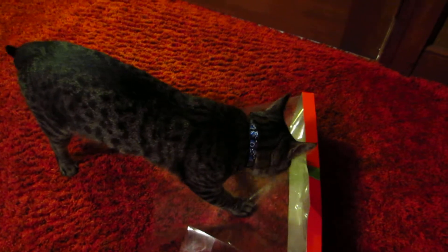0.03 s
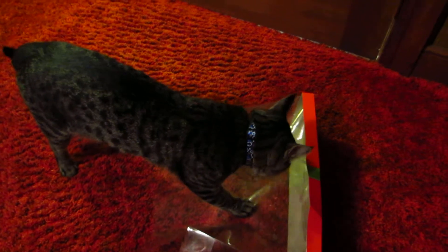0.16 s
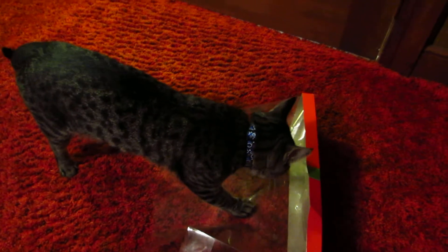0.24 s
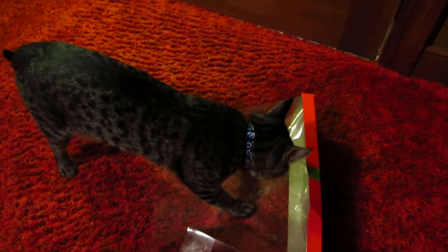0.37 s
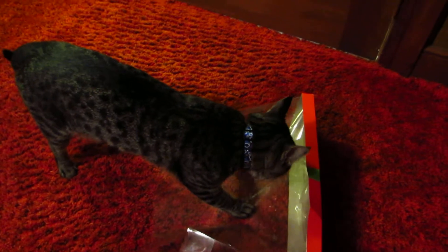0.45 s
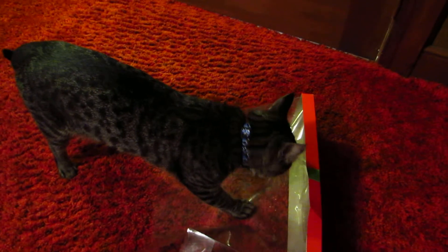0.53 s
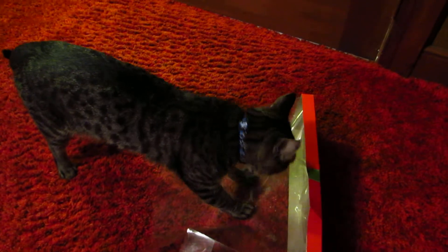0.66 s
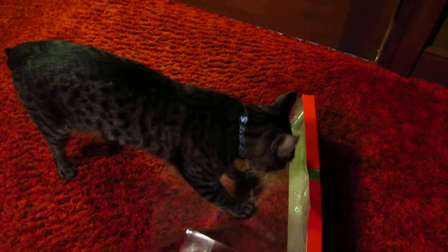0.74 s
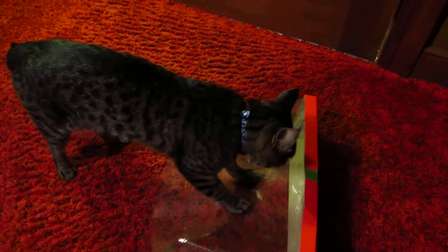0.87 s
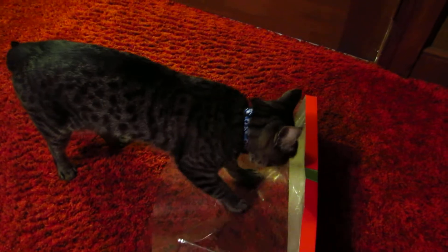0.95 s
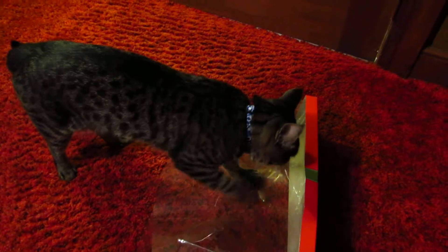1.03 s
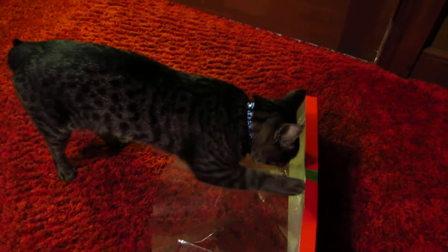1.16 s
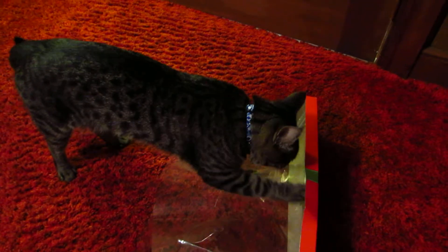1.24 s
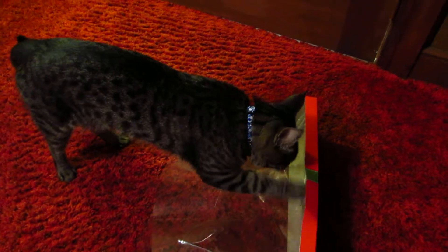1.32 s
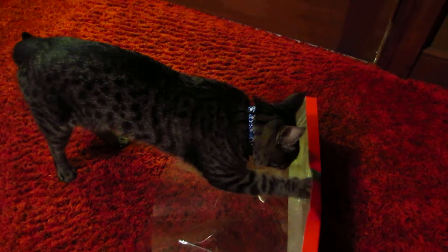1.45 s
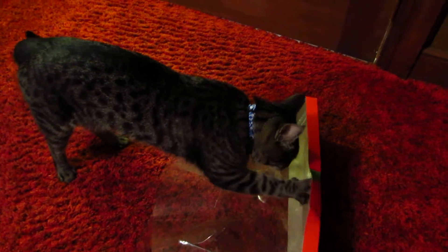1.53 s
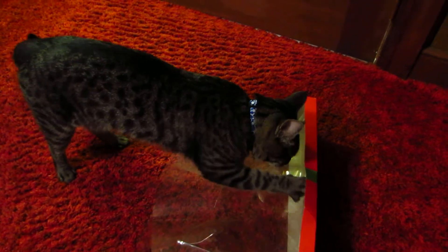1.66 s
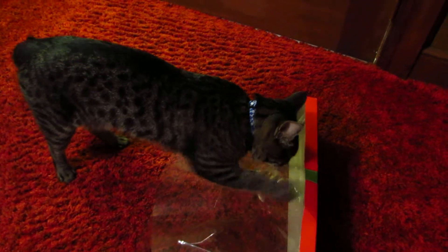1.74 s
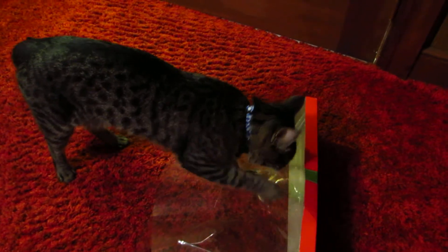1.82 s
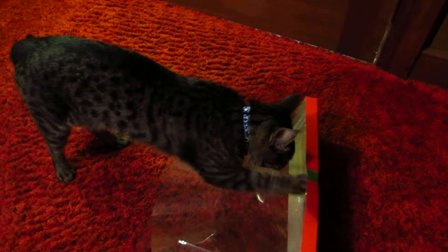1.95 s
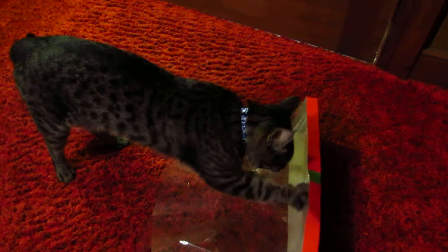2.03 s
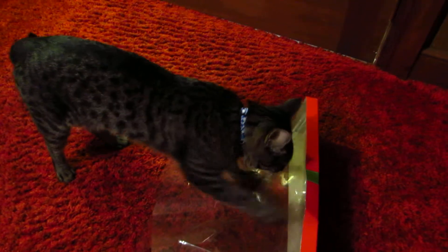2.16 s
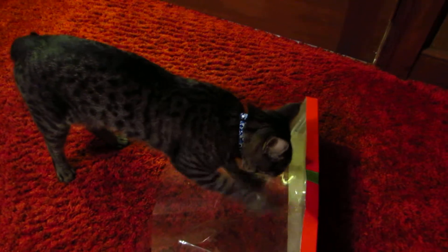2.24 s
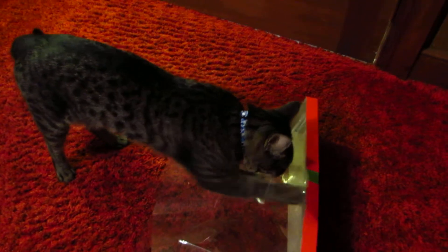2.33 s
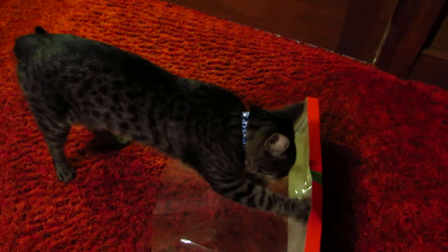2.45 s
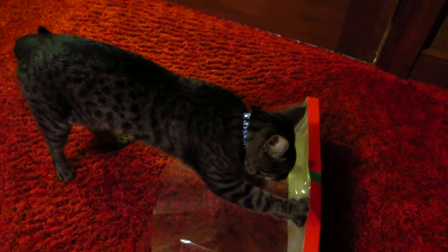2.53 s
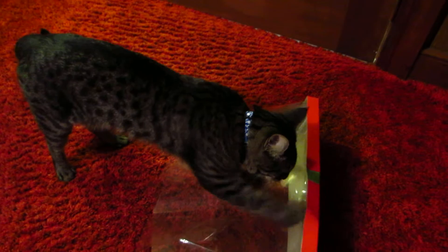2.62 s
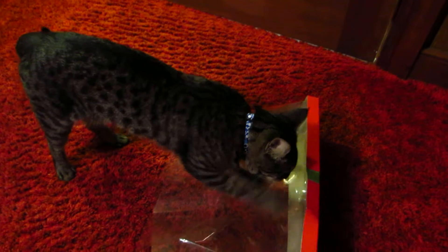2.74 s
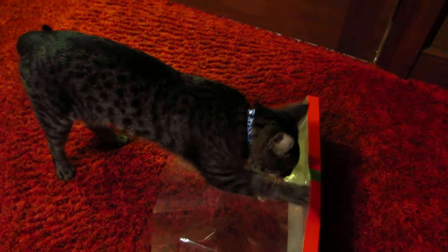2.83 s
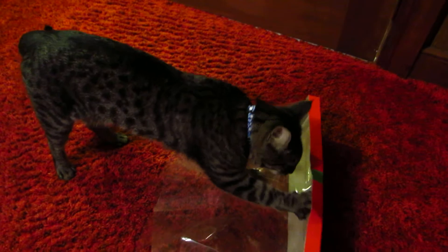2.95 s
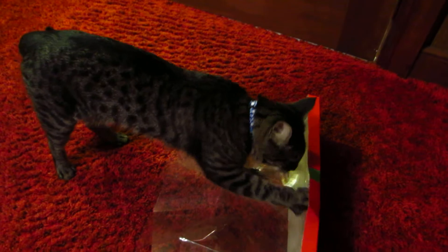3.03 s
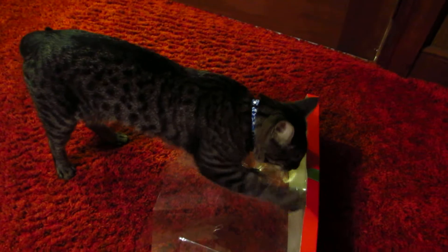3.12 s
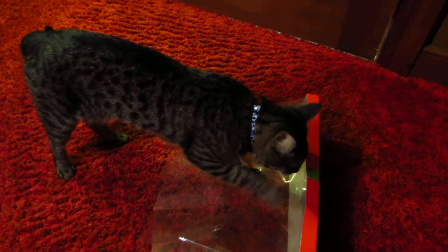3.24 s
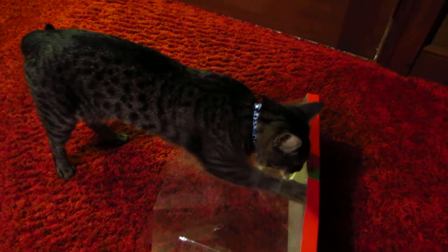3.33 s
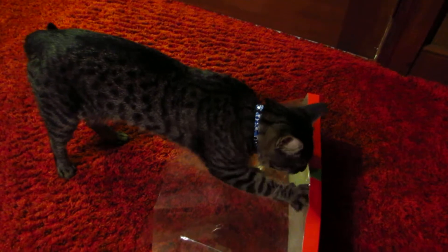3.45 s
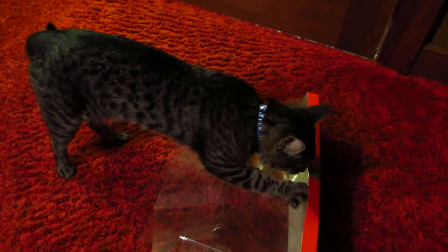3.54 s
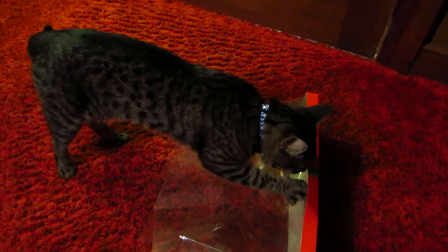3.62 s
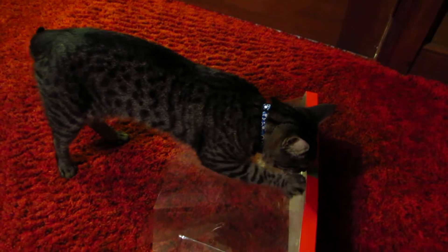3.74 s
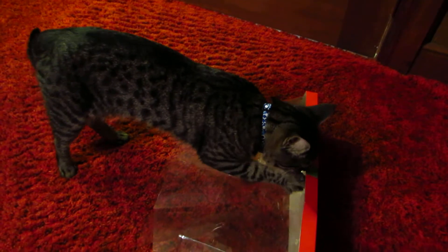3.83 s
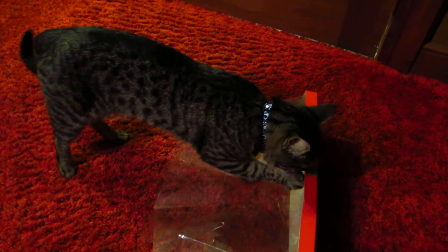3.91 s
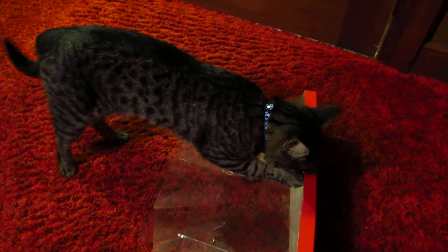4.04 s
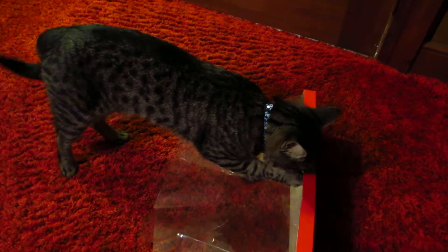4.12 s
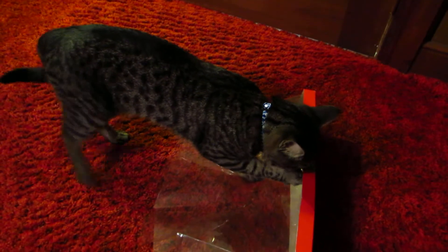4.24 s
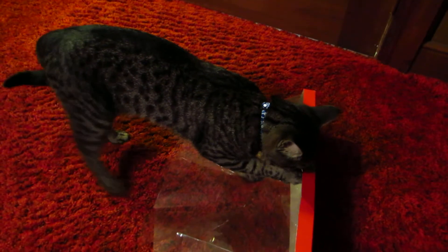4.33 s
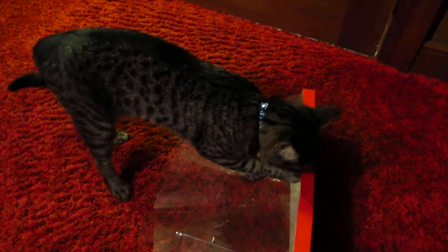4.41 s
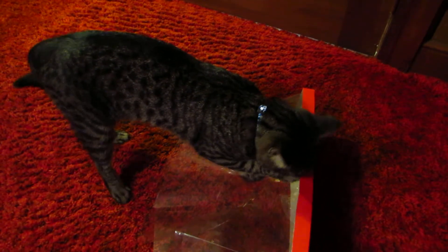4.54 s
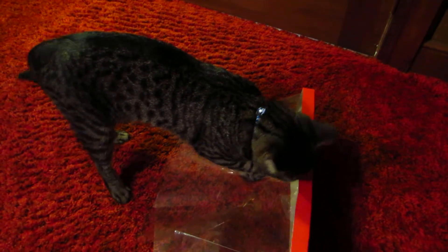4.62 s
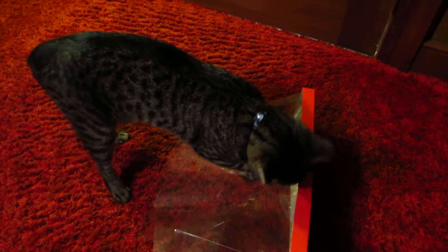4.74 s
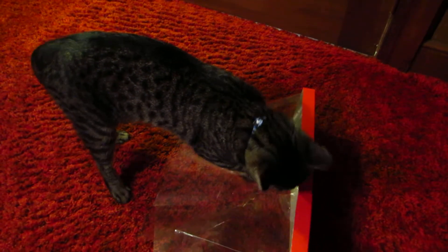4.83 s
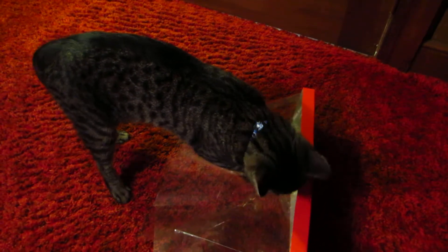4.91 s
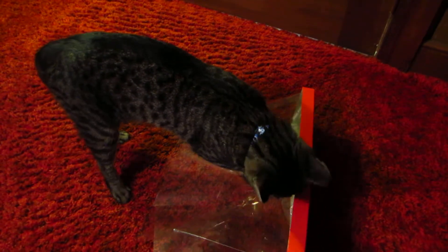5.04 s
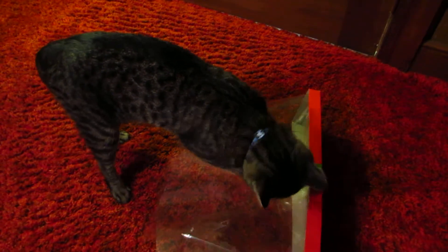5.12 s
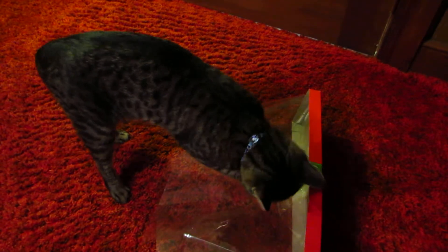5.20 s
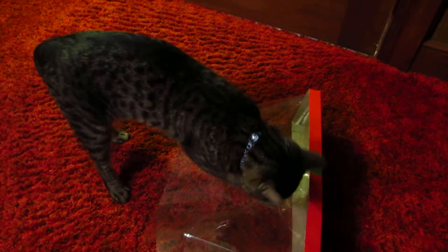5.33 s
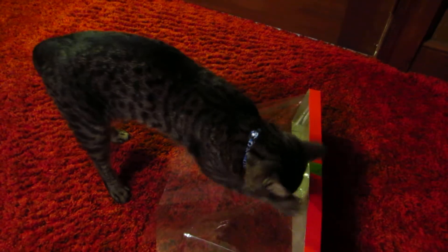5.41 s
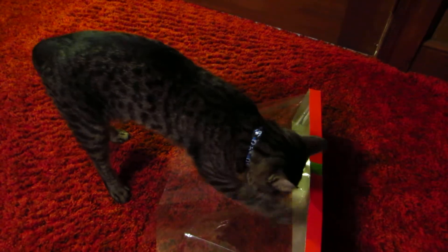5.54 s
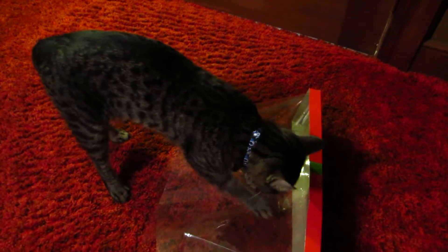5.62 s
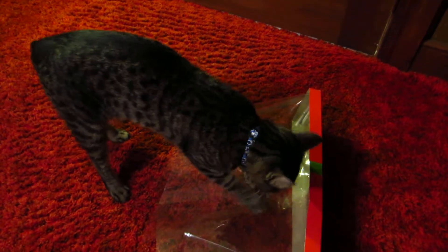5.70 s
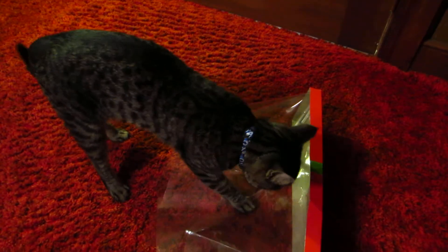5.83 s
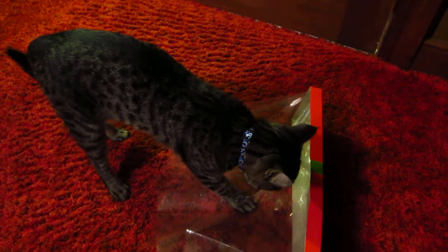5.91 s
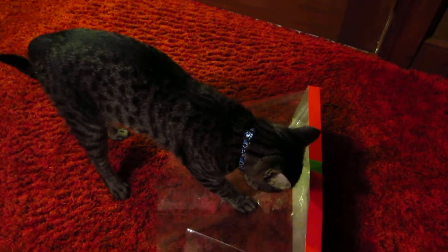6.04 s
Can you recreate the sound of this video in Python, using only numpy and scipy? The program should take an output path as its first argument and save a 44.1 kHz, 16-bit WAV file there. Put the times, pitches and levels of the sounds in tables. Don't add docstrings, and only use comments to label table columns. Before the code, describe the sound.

A cat's paw thumps a hollow cardboard lid while claws snap and crack a plastic sheet, close up over steady hiss.

```python
import sys
import numpy as np
from scipy import signal
from scipy.fft import rfft, irfft, next_fast_len
from scipy.io import wavfile
from scipy.ndimage import uniform_filter1d

SR = 44100
rng = np.random.default_rng(int(sys.argv[2]) if len(sys.argv) > 2 else 0)


def voltage_ratio(decibels):
    exponent = np.asarray(decibels, float) / 20
    return 10 ** exponent


def dump_mix(stems):
    frames = np.atleast_2d(stems).T
    limited = np.clip(frames, -1, 1)
    pcm = np.round(limited * 32767).astype(np.int16)
    wavfile.write(sys.argv[1], SR, pcm)


N = 267687
T = np.arange(N) / SR

# time in seconds, level in dB.
HISS_LEVEL = [(0.0, -71.5), (0.64, -62.5), (0.81, -60.5), (1.17, -60), (1.59, -56.5), (2.94, -53.5),
              (3.03, -53.5), (3.23, -56), (3.65, -52), (4.41, -56), (4.7, -53.5), (4.99, -53),
              (5.24, -61.5), (5.49, -58), (5.7, -56), (6.07, -53)]
# frequency in Hz, level in dB per Hz.
HISS_TONE = [(12, -28), (20, -6.5), (55, -9), (91, -9.5), (367, -9), (897, -18.5), (1610, -23), (1760, -26),
             (3530, -29), (3950, -32.5), (7110, -32.5), (14700, -53.5), (16000, -60.5)]
# frequency in Hz, likeness from -1 to 1.
HISS_LIKENESS = [(30, 0.18), (100, -0.9), (300, -0.45), (1400, -0.78), (5000, -0.037)]
# peak time in seconds, level in dB, swell in seconds, fade in seconds.
SHOVES = [(.005, -24, 0.06, 0.039), (.29, -63, 0.25, 0.39), (.96, -35.5, 0.3, 0.14),
          (1.27, -50, 0.22, 0.25), (1.64, -48, 0.24, .13), (2.08, -30.5, 0.13, 0.17), (2.52, -52, .1, 0.1),
          (2.91, -57, 0.082, 0.21), (3.04, -31, 0.049, 0.22), (3.7, -42, 0.49, 0.22),
          (4.11, -44.5, 0.42, 0.039), (5.11, -21.5, 0.04, 0.12), (5.99, -48.5, 1, 0.71)]
# peak time in seconds, scrape level in dB,
# rustle in dB relative to the scrape, swell in seconds, fade in seconds.
SLIDES = [(.005, -37.5, -28, 0.095, 0.13), (.3, -62.5, 8.5, 0.07, 0.22), (.4, -56.5, 2.5, 0.3, 0.14),
          (.48, -55.5, 2.5, 0.35, 0.028), (.86, -42.5, -0.5, 0.14, 0.18), (1.45, -47.5, 6, 0.023, .06),
          (1.5, -57, -2, 0.37, 1), (2.615, -45, 7, .04, .03), (2.08, -57, -25, 0.37, 0.23),
          (2.45, -56.5, 14, 0.13, 0.13), (2.55, -48, -2, .05, 0.087), (2.909, -48.5, 2, 0.076, 0.2),
          (3.05, -44, 2.5, 0.037, 0.26), (3.16, -50, -15, .2, 0.25), (4.22, -55, -20, 0.084, 0.49),
          (5.19, -49.5, -16, 0.101, 0.16), (5.53, -45, 2, 0.034, 0.11), (5.58, -44, 1.5, .1, 0.071),
          (5.63, -58, -3, .1, 0.03), (5.99, -47, 2.5, 0.52, 0.037)]
# frequency in Hz, width in Hz, level in dB.
LID_NOTES = [(451.3, 47, -2.5), (514.5, 32.2, 0.5), (627.8, 89.5, 2.5), (727, 204, 4), (782, 132, 3.5),
             (944, 71, -8), (1118, 174, -6.5), (1400, 715, -7), (1700, 1940, -11.5)]
# frequency in Hz, width in Hz, level in dB.
FLEX_NOTES = [(123.7, 29, -9.5), (235.5, 66.5, -2), (296.5, 84, -2.5), (341.7, 24.8, 2)]
# frequency in Hz, level in dB per Hz.
SIZZLE_TONE = [(2500, -26), (4000, 6), (5500, 10.5), (7700, 9), (8300, 6.5), (12000, 3), (14500, -4),
               (16500, 3)]
# start in seconds, peak in dB, deep flex in dB relative to the peak,
# time for the rattle to die by 60 dB in seconds.
TOE_BLOWS = [(.013, -24, -41, 0.27), (.633, -42, 1.5, 0.41), (1.276, -16.5, -32, 0.19),
             (1.462, -20, -13, 0.17), (1.597, -23, -8, 0.08), (1.640, -9, -15.5, 0.13),
             (1.955, -29.5, -10, 0.42), (2.448, -27.5, 1.5, 0.36), (2.569, -18.5, -7, 0.022),
             (2.916, -20.5, -5, 0.098), (3.378, -11.5, -14, 0.11), (3.392, -14.5, -15, 0.091),
             (3.56, -21, -8, 0.042), (3.604, -18, -11, 0.091), (3.623, -18.5, -4.5, 0.065),
             (3.684, -41, -2, 0.048), (4.151, -8.5, -13.5, 0.042), (4.556, -45, -1.5, 0.036),
             (4.754, -11, -8.5, 0.035), (5.07, -16, -22, 0.02), (5.078, -17, -7.5, 0.092),
             (5.103, -8.5, -24, 0.089), (5.815, -24, -7.5, 0.03), (5.834, -26, -12.5, 0.033)]
# start in seconds, peak in dB, deep flex in dB relative to the peak,
# time for the rattle to die by 60 dB in seconds.
PAD_BLOWS = [(.217, -34, -9.5, 0.36), (.277, -40.5, -3.5, 0.09), (.346, -27, -10.5, 0.0068),
             (.619, -28.5, -13, 0.17), (.8535, -13, -12.5, 0.015), (.857, -16.5, -15, 0.026),
             (.888, -35, -4, 0.33), (1.288, -19, -8.5, 0.12), (1.358, -33.5, -3, 0.085),
             (2.001, -15.5, -6.5, 0.18), (2.018, -18.5, -10, 0.069), (2.125, -15.5, -7.5, 0.031),
             (2.139, -18, -10, 0.17), (2.379, -28, -9, 0.27), (2.423, -12, -23, 0.048),
             (2.474, -13, -38, 0.03), (2.627, -14, -17, 0.066), (2.86, -24, -9, 0.049),
             (2.868, -15.5, -9, 0.064), (2.884, -11.5, -16.5, 0.15), (3.023, -21.5, -6.5, 0.045),
             (3.425, -20.5, -10.5, 0.093), (3.735, -30.5, -18, 0.095), (4.089, -32.5, -7, 0.03),
             (5.508, -16.5, -14, 0.12), (5.554, -26.5, -11, 0.042)]
# start in seconds, peak in dB, deep flex in dB relative to
# the peak, time for the rattle to die by 60 dB in seconds.
TIP_BLOWS = [(.7125, -5, -24.5, 0.028), (.874, -9.5, -14.5, 0.16), (1.222, -39.5, -3, 0.047),
             (1.288, -47, -15, 0.26), (1.723, -18.5, -14, 0.052), (1.739, -19, -16, 0.034),
             (1.753, -21, -9, 0.044), (1.995, -18, -10, 0.08), (2.406, -9, -14.5, 0.099),
             (2.6105, -9, -10, 0.048), (2.875, -8, -25, 0.095), (2.951, -16.5, -16, 0.028),
             (3.045, -5, -21, 0.048), (3.089, -11.5, -17.5, 0.025), (3.109, -15, -7.5, 0.035),
             (3.3365, -26, -8, 0.87), (4.763, -34, -13, 0.018), (5.095, -20.5, -7, 0.043),
             (5.116, -16.5, -12, 0.12), (5.4625, -27.5, -13, 0.09), (5.745, -34, -52, 0.041)]
# start in seconds, peak in dB, snap pitch in Hz,
# sizzle in dB relative to the peak.
RAKES = [(.0164, -27, 1390, -17.5), (.62, -31.5, 1700, -18), (.7155, -12, 1950, -36),
         (1.439, -44, 3220, -6), (1.4609, -24, 1680, -13), (1.648, -20.5, 2200, -56),
         (1.7344, -18, 2040, -17), (1.9545, -24, 2840, -15), (2.3528, -26.5, 2000, -12),
         (2.3794, -24.5, 1560, -14.5), (2.5935, -27.5, 2000, -29), (2.9182, -31, 1560, -21),
         (2.9524, -26, 2310, -13.5), (3.3365, -32, 1700, -15), (3.3775, -22.5, 1520, -23),
         (3.6047, -30, 1840, -25), (3.6208, -21, 1400, -19), (5.4643, -26, 1940, -17.5),
         (5.5095, -28, 1600, -35), (6.0522, -35.5, 2580, -13)]
# start in seconds, peak in dB, snap pitch in Hz,
# sizzle in dB relative to the peak.
CATCHES = [(.2135, -35, 1670, -17), (.6719, -39.5, 1910, -16), (.8684, -19.5, 2000, -15.5),
           (.886, -16, 2330, -48), (1.2244, -33, 1900, -26), (1.2925, -30.5, 1360, -18),
           (1.3628, -36.5, 2830, -12), (1.5307, -32.5, 2620, -20), (2.0032, -13.5, 1530, -25),
           (2.0114, -16.5, 1400, -19.5), (2.1344, -19, 1670, -18), (2.3935, -25.5, 2600, -17),
           (2.4063, -29, 1650, -39), (2.4822, -20, 1890, -18.5), (2.546, -37, 1640, -27),
           (2.569, -42, 1400, -26), (2.8434, -17.5, 2620, -17), (2.8594, -27, 2530, -17),
           (2.9433, -25.5, 3080, -28), (3.0485, -42, 1570, -30), (3.1837, -31, 2090, -16),
           (3.3617, -29, 2670, -14), (3.4034, -28, 1640, -13.5), (3.046, -10.5, 1250, -33),
           (3.734, -34, 2170, -36), (4.7547, -4.5, 1400, -41), (5.0702, -26, 2190, -55),
           (5.5877, -32.5, 3270, -12), (5.9533, -33, 1780, -10)]
# start in seconds, peak in dB, snap pitch in Hz,
# sizzle in dB relative to the peak.
SNAPS = [(.7205, -5.5, 1740, -28), (.8586, -13, 1310, -15.5), (1.5945, -26.5, 1490, -24),
         (1.6437, -15.5, 2250, -40), (1.723, -15, 2470, -21.5), (2.1164, -19.5, 2070, -21),
         (2.1265, -12.5, 2270, -13), (2.6208, -9, 2770, -12), (2.8342, -17.5, 3100, -11),
         (2.8738, -18, 1400, -33), (3.0897, -8, 1700, -64), (3.1222, -13.5, 2390, -15.5),
         (3.1314, -20.5, 2600, -18), (4.1512, -4, 2300, -24.5), (4.1548, -24, 2600, -30),
         (5.0957, -4.5, 2440, -12), (5.1062, -15, 2400, -20), (5.5545, -29.5, 2300, -24),
         (5.6254, -31, 1720, -19), (5.7458, -23.5, 2620, -17)]
# start in seconds, peak in dB, pitch in Hz,
# time to die by 60 dB in seconds.
RINGS = [(0.017, -20.5, 526, 0.073), (0.28, -37, 585, 0.077), (0.345, -22.5, 716, 0.034),
         (0.619, -32, 537, 0.054), (0.729, -16, 810, 0.04), (0.721, -12.5, 667, 0.1),
         (0.858, -5, 834, 0.043), (0.861, -19, 833, 0.017), (0.885, -18, 690, 0.013),
         (1.289, -13, 767, 0.041), (1.295, -14, 735, 0.042), (1.466, -23, 623, 0.049),
         (1.598, -17, 623, 0.056), (1.652, -14, 508, 0.051), (1.723, -14, 650, 0.031),
         (1.939, -28, 600, 0.03), (2.002, -19, 720, 0.041), (2.125, -1.5, 673, 0.02),
         (2.189, -25, 627, 0.037), (2.41, -8, 582, 0.067), (2.415, -8.5, 710, 0.077),
         (2.427, -10.5, 434, 0.069), (2.474, -17, 677, 0.059), (2.5685, -8.5, 402, 0.034),
         (2.6112, 0, 380, 0.023), (2.858, -25, 754, 0.035), (2.884, -16, 740, 0.027),
         (2.919, -12, 570, 0.037), (3.033, -23, 670, 0.04), (3.0455, -7, 450, 0.023),
         (3.051, -4, 628, 0.033), (3.336, -13.5, 680, 0.015), (3.393, -2, 586, 0.034),
         (3.5635, -5.5, 656, 0.024), (3.604, -13, 650, 0.031), (4.088, -25, 503, 0.033),
         (4.1525, 0.5, 713, 0.023), (4.159, -20, 525, 0.015), (4.754, -7.5, 485, 0.061),
         (4.762, -19, 970, 0.025), (5.0812, -3.5, 725, 0.02), (5.105, -6, 748, 0.026),
         (5.117, -16, 727, 0.026), (5.46, -20, 580, 0.026), (5.5125, -8.5, 617, 0.037),
         (5.553, -15, 509, 0.029), (5.8185, -25.5, 743, 0.042), (5.835, -19, 434, 0.097),
         (5.746, -27, 405, 0.039)]
# start in
# seconds, peak in dB, pitch in Hz, time to die by 60 dB in seconds.
CRACKS = [(1.639, -22, 2040, 0.013), (0.7128, -3, 990, 0.013), (0.7192, -2.5, 1680, 0.0055),
          (0.859, -26, 1200, 0.008), (0.863, -12, 1410, 0.0088), (0.8666, -4, 1620, 0.0055),
          (1.2246, -33, 1740, 0.008), (1.287, -16, 1350, 0.0089), (1.462, -33, 1280, 0.0089),
          (1.5322, -29, 2720, 0.0071), (1.5945, -28, 1100, 0.0073), (1.6485, -4.5, 1830, 0.007),
          (1.7235, -16, 1740, 0.0076), (3.0898, -5.5, 2180, 0.0082), (1.9555, -24, 3220, 0.0058),
          (0.876, -12, 1790, 0.0073), (2.0075, -5.5, 1290, 0.0069), (2.113, -24, 1910, 0.01),
          (2.128, -37, 1210, 0.0065), (2.3518, -39, 1910, 0.008), (2.394, -30, 1610, 0.008),
          (2.4058, -14, 1620, 0.0093), (2.4726, -12, 1310, 0.0061), (2.5677, -26, 1390, 0.008),
          (2.595, -29, 1770, 0.008), (2.6215, -5, 1700, 0.0032), (2.6105, -20, 1500, 0.008),
          (2.834, -14.5, 2770, 0.0097), (2.8735, -9.5, 1420, 0.0093), (2.9203, -14, 1190, 0.0089),
          (2.9427, -21, 2240, 0.008), (3.0457, 2, 900, 0.0042), (3.0889, -0.5, 1190, 0.011),
          (3.1214, -10, 3500, 0.0049), (3.3363, -31, 1700, 0.008), (3.3603, -26, 2790, 0.0068),
          (3.3777, -15, 1600, 0.014), (3.3816, -18, 1630, 0.015), (3.5583, -20, 886, 0.008),
          (0.3455, -31, 1200, 0.013), (3.6218, -18, 1430, 0.008), (4.1511, -6.5, 1855, 0.021),
          (4.7542, -22, 1550, 0.0048), (5.0702, -12, 1470, 0.0038), (5.0951, 6.5, 2330, 0.0053),
          (5.0745, -21, 1500, 0.0055), (5.4628, -26, 1300, 0.0072), (5.5135, -28, 1310, 0.011),
          (5.746, -21.5, 1190, 0.011),
          (0.7194, 2.5, 2080, 0.0039), (0.728, -8, 2270, 0.0066), (0.8854, -11.5, 1700, 0.0075),
           (0.892, -18, 3030, 0.0079), (1.6443, 0.5, 2210, 0.005), (1.652, -8.5, 2330, 0.0067),
           (1.66, -8, 2070, 0.0046), (1.739, -12, 1970, 0.0067), (2.0071, -12, 1650, 0.011),
           (2.023, -16, 1290, 0.0057), (2.134, -15, 1500, 0.0044), (4.1532, -1.5, 3180, 0.0019),
           (4.153, -24, 2530, 0.0065), (4.161, -6, 1570, 0.0066), (4.756, -13, 1320, 0.0073),
           (4.764, -9, 1480, 0.01), (5.0978, -4, 2570, 0.0034), (5.1068, 0, 2080, 0.0043),
           (5.111, -7, 1300, 0.007)]
# start in seconds, peak in dB, pitch in Hz.
THUDS = [(0.859, -36, 79.5), (1.46, -47, 61), (1.73, -40, 50), (2.01, -48, 52), (0.716, -29, 170),
         (2.62, -44, 52), (2.9, -39, 50), (3.0875, -10.5, 218), (3.385, -43, 50), (4.754, -34, 113),
         (5.1, -38, 55), (5.83, -44, 55)]
# frequency in Hz, time to die by 60 dB in seconds.
ROOM_DECAY = [(120, 0.57), (400, 0.24), (1000, 0.35), (3000, 0.3), (8000, 0.23), (15000, 0.12)]
# frequency in Hz, how far the left leads in radians.
PORT_LEAD = [(0, 0.35), (6200, -0.39), (9470, -1.14), (9730, -1.35), (11500, -1.2), (13000, -1.4),
             (16000, -1.5)]
# frequency in Hz, left minus right in dB.
PORT_LEVEL = [(60, -3.5), (240, -3), (950, -2), (3770, -2.75), (15000, 0)]
# frequency in Hz, width in Hz, depth from 0 to 1.
BAND_SEAMS = [(3950, 330, .75), (7950, 400, .7)]


def evened(x):
    return x / np.sqrt(np.mean(x ** 2) + 1e-20)


def peaked(x, db):
    return x * voltage_ratio(db) / abs(x).max()


def read(points, hz):
    f, value = np.transpose(points)
    return np.interp(np.log(hz + 1), np.log(f + 1), value)


def add(mix, s, sound):
    part = mix[max(round(s * SR), 0):][:len(sound)]
    part += sound[:len(part)]


def band(x, lo_hz, hi_hz, order=3):
    return signal.sosfilt(signal.butter(order, [lo_hz, hi_hz], "band", fs=SR, output="sos"), x)


def resonate(x, hz, width):
    return signal.lfilter(*signal.iirpeak(hz, hz / width, SR), x)


def body(x, notes, detune):
    out = 0
    for k, ((hz, width, db), shift) in enumerate(zip(notes, detune)):
        out = out + (-1) ** k * voltage_ratio(db) * resonate(x, hz * shift, width)
    return out


def colour(x, points):
    log_gain = read(points, abs(np.fft.fftfreq(2048, 1 / SR))) * np.log(10) / 20
    taps = np.fft.ifft(np.exp(np.conj(signal.hilbert(log_gain)))).real[:1024]
    return signal.oaconvolve(x, taps)[:len(x)]


def hiss():
    frames, hz = N // 256 + 5, np.fft.rfftfreq(1024, 1 / SR)
    a, b, c, d, patches = rng.standard_normal((frames, 513, 5)).T
    patches = uniform_filter1d(uniform_filter1d(patches, 12, 0), 14, 1)
    same = np.clip(read(HISS_LIKENESS, hz), -1, 1)[:, None]
    left, other = a + 1j * b, c + 1j * d
    z = np.array([left, same * left + np.sqrt(1 - same ** 2) * other])
    z *= voltage_ratio(read(HISS_TONE, hz)[:, None] + 1.3 * evened(patches))
    noise = signal.istft(z, nperseg=1024, noverlap=768)[1][:, :N]
    return voltage_ratio(np.interp(T, *np.transpose(HISS_LEVEL)) + 8.0) * evened(noise)


def slips(count, per_s, spread_db):
    when, sign, size = rng.random((count, 3)).T
    clicks = (when < per_s / SR) * np.sign(sign - .5) * voltage_ratio(-spread_db * np.log(size + 0.16))
    return evened(clicks + 0.073 * sign)


def strokes(rows, rest_db):
    power = voltage_ratio(2 * (np.interp(T, *np.transpose(HISS_LEVEL)) + rest_db))
    for s, db, swell, fade in rows:
        away = np.maximum((s - T) / max(swell, .01), (T - s) / max(fade, .01))
        power = power + voltage_ratio(2 * (db - 20 * away))
    return np.sqrt(power)


def drag():
    low = band(slips(N, 2500, 0.69), 44, 2100)
    high = slips(N, 11000, 0.92)
    lid = evened(body(low, LID_NOTES, np.ones(9))) + 0.45 * evened(body(low, FLEX_NOTES, np.ones(9)))
    scrape = band(high, 930, 3260, order=2)
    shove_level = strokes(SHOVES, rest_db=5)
    scrape_level = strokes([(s, db, *shape) for s, db, _, *shape in SLIDES], rest_db=-3.5)
    rustle_rows = [(s, db + more_db, *shape) for s, db, more_db, *shape in SLIDES]
    rustle_level = strokes(rustle_rows, rest_db=-0.8)
    out = voltage_ratio(-7.0) * shove_level * evened(lid)
    out = out + voltage_ratio(-3.5) * scrape_level * evened(scrape)
    return out + voltage_ratio(-8.5) * rustle_level * evened(colour(high, SIZZLE_TONE))


def rattle(t60, rise, per_s, knock, buzz_db, buzz_t60, size=12000):
    t = np.arange(size) / SR
    drive = slips(size, per_s, 4.6)
    drive[8] += knock
    fading = voltage_ratio(-60 * t / max(t60, .004)) + voltage_ratio(buzz_db - 60 * t / buzz_t60)
    return drive * fading * np.minimum(t / max(rise, 2e-4) + 0.66, 1)


def blows(table, rise, contact_ms):
    out = np.zeros(N)
    softness = signal.butter(4, np.clip(1000 / contact_ms, 500, 6000), fs=SR, output="sos")
    for s, db, flex_db, t60 in table:
        drive = rattle(t60, rise, per_s=3000, knock=8.6, buzz_db=-9.0, buzz_t60=0.28)
        drive = signal.sosfilt(softness, drive)
        spot = 1 + .04 * rng.standard_normal((2, 9))
        lid = peaked(body(drive, LID_NOTES, spot[0]), db - 5.0)
        flex = peaked(body(drive, FLEX_NOTES, spot[1]), db + flex_db)
        add(out, s, lid + flex)
    return out


def claws(table, t60, rise):
    out = np.zeros(N)
    for s, db, hz, sizzle_db in table:
        drive = rattle(t60, rise, per_s=9000, knock=5.46, buzz_db=-21.5, buzz_t60=0.39)
        snap = band(drive, 0.22 * hz, min(2.19 * hz, 3800), order=4)
        snap = snap + 1.4 * resonate(snap, hz, 630)
        sizzle = peaked(colour(drive, SIZZLE_TONE), db + sizzle_db + 4.5)
        add(out, s, peaked(snap, db - 3.0) + sizzle)
    return out


def rings(table, trim_db, rise_turns):
    out, t = np.zeros(N), np.arange(SR // 5) / SR
    for s, db, hz, t60 in table:
        rise = 1 - np.exp(-(t * hz / max(rise_turns, .05)) ** 2)
        fading = voltage_ratio(db + trim_db - 60 * t / max(t60, .002))
        add(out, s, rise * fading * np.sin(2 * np.pi * hz * t))
    return band(out, 145, 12000, order=2)


def thuds():
    out, t = np.zeros(N), np.arange(SR // 4) / SR
    for s, db, hz in THUDS:
        u = t / (0.0084 * np.sqrt(52 / hz))
        push = u * np.exp(1 - u) * np.sin(2 * np.pi * hz * t) * np.minimum(t * hz, 1)
        add(out, s, voltage_ratio(db) * band(push, hz / 2, 2 * hz, order=2))
    return out


def room(x):
    out = np.zeros((2, N))
    slots = np.arange(200, SR // 2 - 20, 20)
    for k in range(3):
        taps = np.zeros((3, SR // 2))
        at = slots + rng.integers(0, 20, (3, len(slots)))
        np.put_along_axis(taps, at, rng.choice([-1., 1.], at.shape), 1)
        hz, t, z = signal.stft(taps, SR, nperseg=256)
        z = z[:2] * np.clip(hz / 3200 + 0.065, 0, 3)[:, None] + z[2]
        fading = voltage_ratio(-60 * t / read(ROOM_DECAY, hz)[:, None])
        tail = signal.istft(z * fading, SR, nperseg=256)[1]
        turn = np.sqrt(2 / 3) * np.sin(np.pi * (9 * T + k / 3))
        out += signal.fftconvolve(x[None] * turn, tail / np.linalg.norm(tail[0]), axes=1)[:, :N]
    return out


def ports(x):
    size = next_fast_len(N)
    hz = np.fft.rfftfreq(size, 1 / SR)
    half = voltage_ratio(read(PORT_LEVEL, hz) / 2) * np.exp(.5j * read(PORT_LEAD, hz))
    return irfft(rfft(x, size) * np.array([half, 1 / half]), size)[:, :N]


def scene():
    hits = blows(PAD_BLOWS, rise=0.001, contact_ms=1)
    hits = hits + blows(TOE_BLOWS, rise=0.0142, contact_ms=0.62)
    hits = hits + blows(TIP_BLOWS, rise=0.0035, contact_ms=0.51)
    hits = hits + claws(SNAPS, t60=0.039, rise=0.00043)
    hits = hits + claws(CATCHES, t60=0.065, rise=0.0019)
    hits = hits + claws(RAKES, t60=0.093, rise=0.00071)
    hits = hits + rings(RINGS, trim_db=-5.5, rise_turns=0.99)
    hits = hits + rings(CRACKS, trim_db=-3, rise_turns=0.63)
    sliding = drag()
    direct = hits + thuds() + 0.91 * sliding
    echoes = room(voltage_ratio(-12.0) * hits + voltage_ratio(-5.0) * sliding)
    return ports(np.array([direct, direct]) + echoes) + hiss()


def band_limit(x):
    return signal.sosfilt(signal.butter(12, 16470, fs=SR, output="sos"), x)


def record(dry):
    for hz, width, depth in BAND_SEAMS:
        dry = dry - np.clip(depth, 0, 1) * resonate(dry, hz, width)
    dry = signal.sosfilt(signal.cheby2(14, 60, 15300, fs=SR, output="sos"), dry)
    return band_limit(np.clip(1.486 * dry, -1, 1))


dry = scene()
out = record(dry)
dump_mix(out)
```